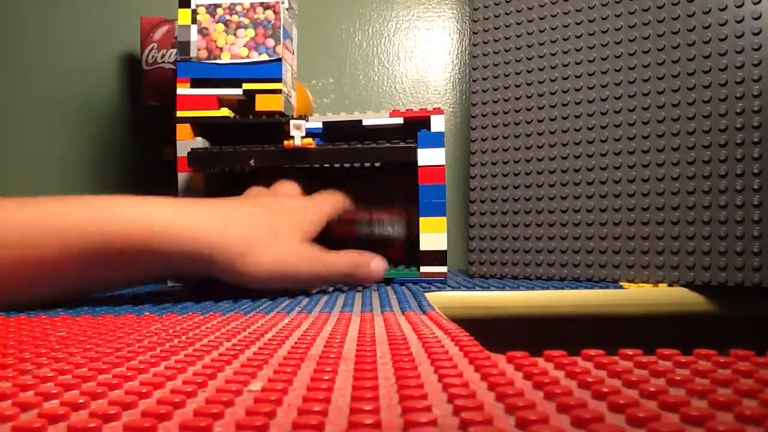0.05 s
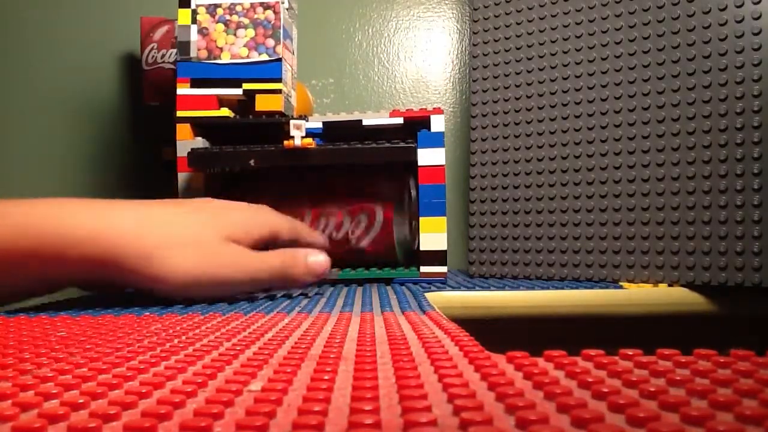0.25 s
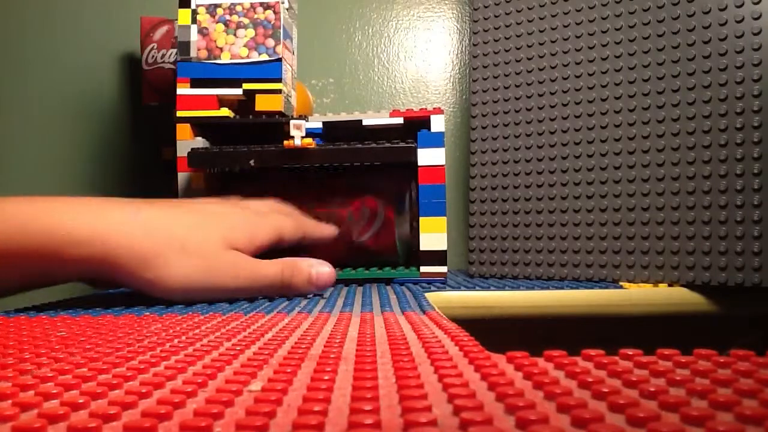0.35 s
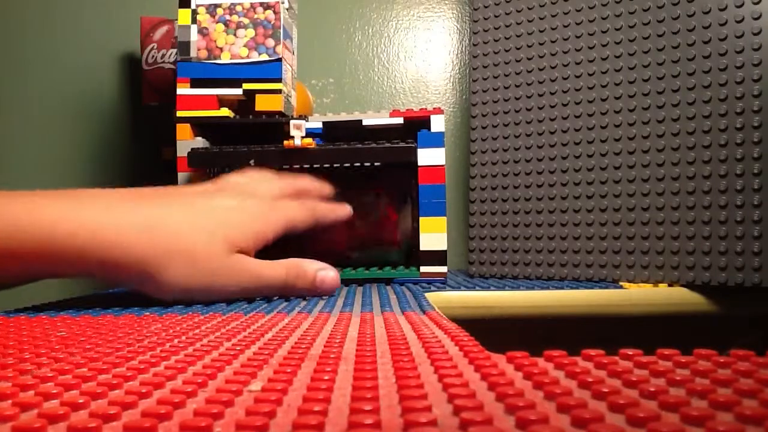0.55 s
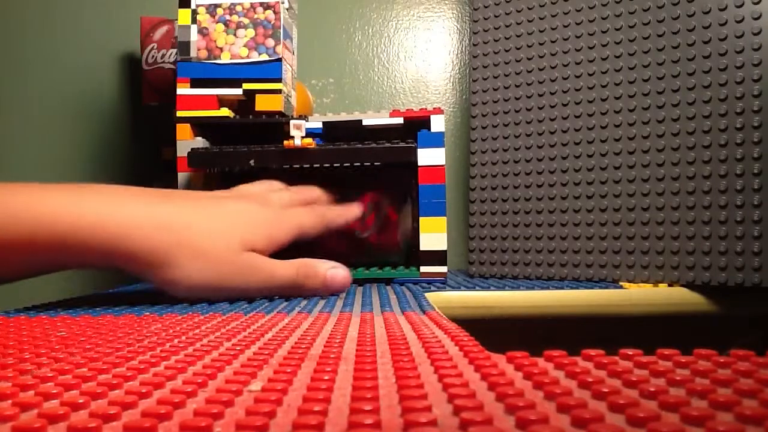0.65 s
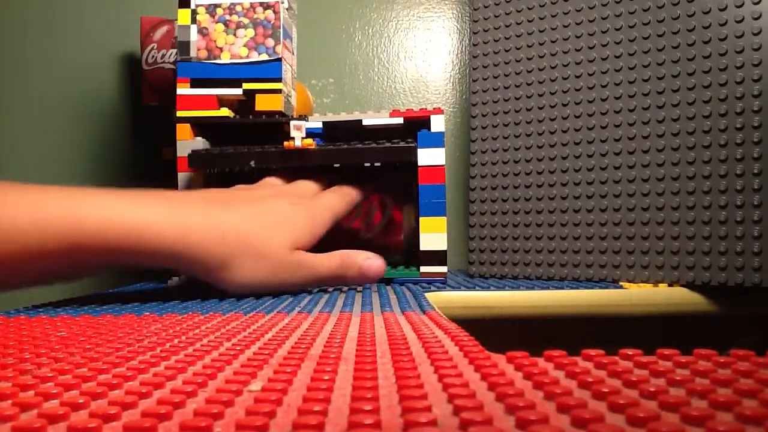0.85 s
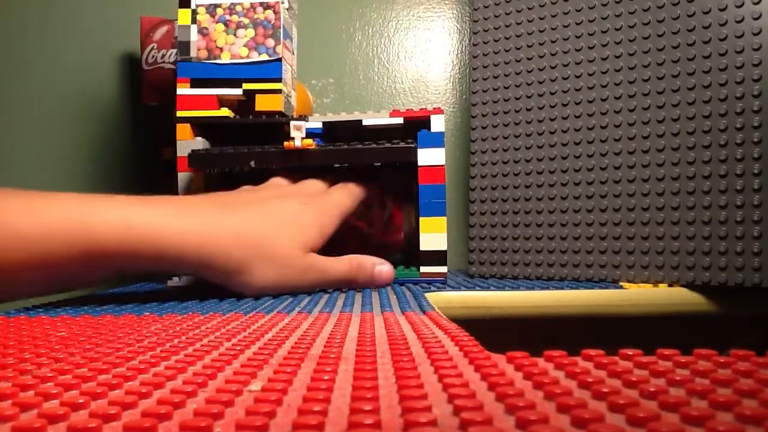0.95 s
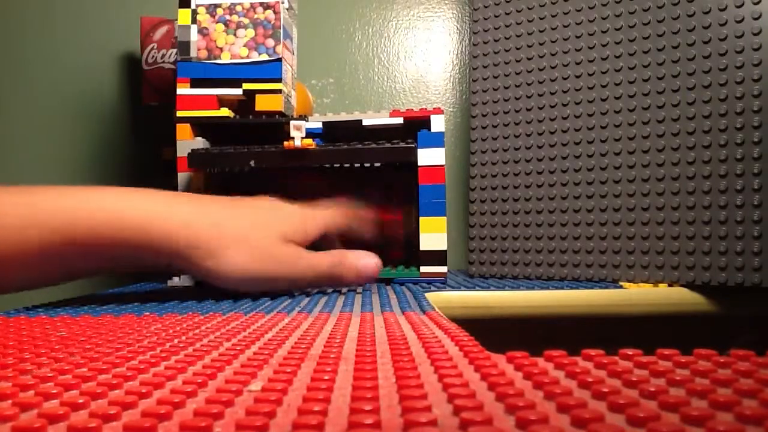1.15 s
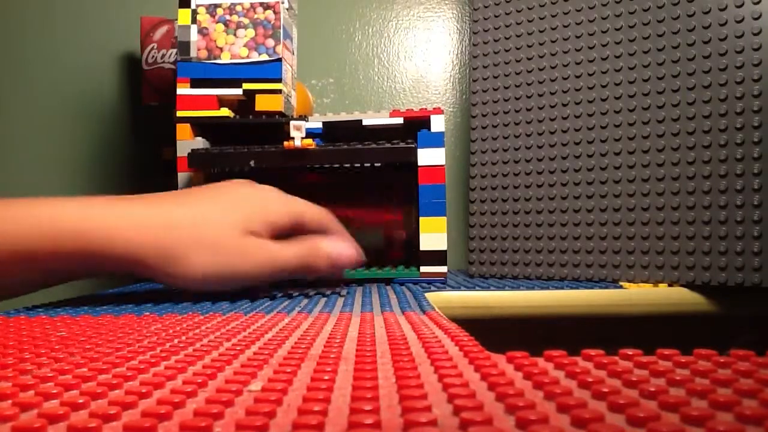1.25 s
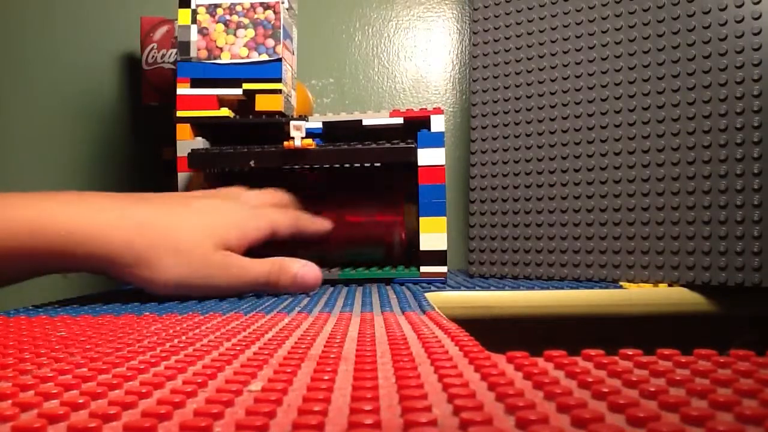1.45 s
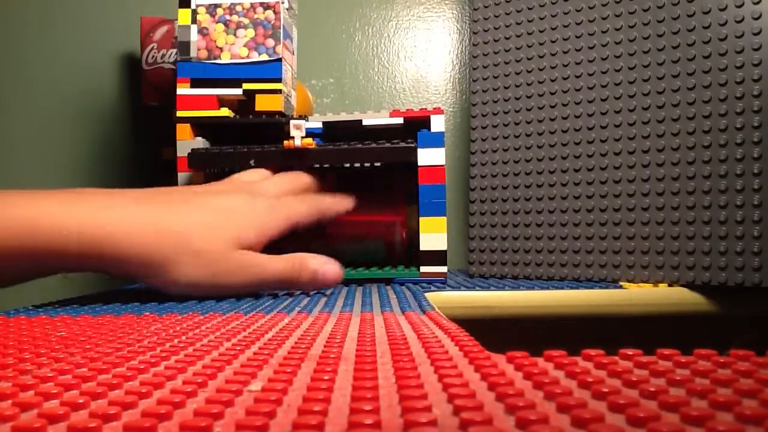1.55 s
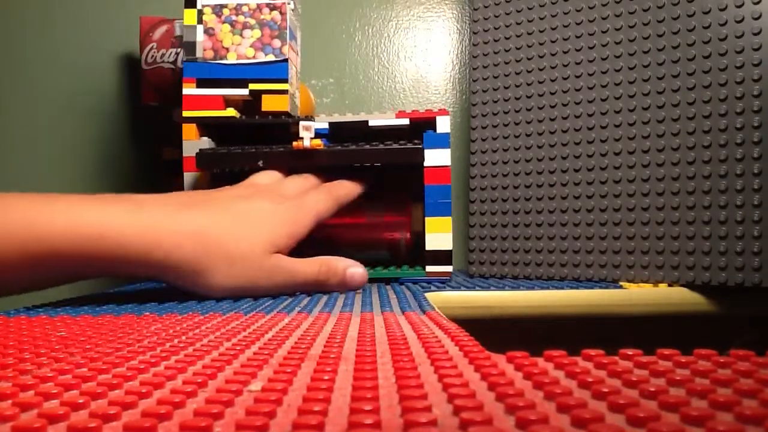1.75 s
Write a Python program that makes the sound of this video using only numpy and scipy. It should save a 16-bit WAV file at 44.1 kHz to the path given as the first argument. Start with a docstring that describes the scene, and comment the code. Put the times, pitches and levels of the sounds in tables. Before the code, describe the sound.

An empty drink can rattles and knocks as a hand rolls it in a chute of plastic toy bricks. It rolls twice, ringing faintly, with soft brushing and small ticks in between, in a small room.

```python
"""An empty drink can, rolled to and fro by hand in a chute of plastic toy bricks, knocks and rattles.
Its blows on the walls and its bumps over the studs excite the hollow chute and the can's own modes,
which ring on. In between, the hand brushes the bricks; short pitched ticks and squeaks are heard too.
The chute lies on a table in a small room, which adds a short reverberation and a steady room tone."""
import sys
import numpy as np
from scipy import signal
from scipy.fft import rfft, irfft, next_fast_len
from scipy.io import wavfile
from scipy.ndimage import map_coordinates

SR = 44100
rng = np.random.default_rng(int(sys.argv[2]) if len(sys.argv) > 2 else 0)


def master(y):
    """Save y as 16-bit WAV."""
    cut = np.clip(np.atleast_2d(y).T, -1, 1)
    pcm = np.round(cut * 32767)  # scale
    wavfile.write(sys.argv[1], SR, pcm.astype(np.int16))


N = 79380

# The four registers: bass, middle, upper middle, treble. Each row: nominal centre in Hz, contact t60 and
# room t60 in seconds, then gains in dB for the room's tail, the knocks, the rolling and the brushing.
REGISTERS = [(280, 0.053, 0.44, -13.5, -4, -7, -5), (1000, 0.064, 0.32, -16, -3, -4, -5.5),
             (3100, 0.052, 0.22, -13, -9, -1.5, -1.5), (9000, 0.035, 0.22, -17, 4, -10.5, -4.5)]


def knocks():
    """Impact: knocks against the walls, each with its own level and tone colour; most are the can's, the one at
    0.37 s is the hand striking a brick."""
    # Each row: start in seconds, level in dB, then bass, middle and treble offsets in dB.
    impacts = [(.0875, -37, -3, -1, -27), (.128, -35, -5, -7, -19), (.2008, -35.5, -19, 8, -17),
               (.2038, -14, -25.5, -12.5, -11.5), (.208, -19.5, -12, -18, -19),
               (.2495, -21, -12, -9.5, -16), (.2857, -30, -10, -5, -6.5), (.3114, -30, -25, 1, -16),
               (.3698, -19.5, -39, -16, -8), (.3844, -29, -9.5, -22, -11), (.4773, -37.5, -3, 0, -17.5),
               (.569, -42.5, -11, -1.5, -16.5), (.654, -54.5, 0, -2.5, -1), (.8343, -39.5, -22, -1.5, -10),
               (.850, -43, -27, 0, -7), (.881, -37, -20, -20, -7.5), (.9431, -49.5, 0, 2.5, -17),
               (1.0285, -45, -19, -20, -18), (1.1328, -21, -10, -6, -33), (1.169, -18, -18, -5, -23),
               (1.1977, -16.5, -17, -18, -16), (1.2278, -19, -19.5, -2.5, -21),
               (1.2525, -23.5, -4, -1, -14), (1.2784, -26, -6, 0, -21), (1.3198, -29, -13, -15, -17),
               (1.3965, -19.5, -18.5, -13.5, -14.5), (1.4125, -31, -28, -30, -11),
               (1.4375, -33, 2.5, 4.5, -28), (1.4485, -24, -18, -5.5, -14), (1.5157, -40.5, -11, 9, -13),
               (1.606, -48.5, -5, -2, -5), (1.6555, -36.5, -16, -31, -7), (1.7202, -48, -7, -5, -8),
               (1.7938, -37, -26, -16, -19)]
    out, knock_db = np.zeros(N), np.transpose(REGISTERS)[4]
    for start, db, bass, middle, treble in impacts:
        gains = amp(db + np.array([bass, middle, 0, treble]) + knock_db)
        add(out, start, gains @ contact())
    return out


def roll_controls(treble_share=0.67):
    """Rolling excitation: gain per register, push on the modes, and its centre in Hz, rising with speed."""
    # One list per roll. Each row: time in seconds, rattle level, bass offset, brightness and push in dB,
    # centre of the push in Hz.
    rolls = [
        [(0, -48.5, 3, -5, -35.5, 683), (.105, -57.5, -2, 2, -62, 740), (.118, -63, -5, -11, -38, 930),
         (.14, -48, 5.5, -7, -44.5, 1030), (.195, -56.5, 10, -3, -46, 1080),
         (.212, -42.5, -16, 13, -18.5, 1200), (.24, -44.5, 9.5, 3.5, -39, 1270), (.275, -37, -1, 6, -26, 1280),
         (.29, -37.5, 5, -0.5, -28.5, 1160), (.303, -43, 4, -1, -34.5, 407), (.322, -44, 1, 0.5, -37.5, 327),
         (.345, -60, 9, -2, -40.5, 303), (.39, -39.5, 1, 4, -65, 406), (.43, -42.5, 2.5, -7.5, -41, 730),
         (.46, -70, -3.5, -21, -43.5, 860), (.495, -44, 6, -10, -46, 940), (.53, -82, -8, -18, -44, 890)],
        [(1.122, -43, -10, 8, -35, 1190), (1.131, -51, -13, 0, -58, 1200), (1.15, -32, 3, 0.5, -30, 1200),
         (1.162, -43, -1, 0, -42, 1200), (1.185, -36.5, 3, -2, -28.5, 1140), (1.222, -31, -1.5, -6, -34, 1270),
         (1.231, -34.5, 6.5, 3, -21.5, 1350), (1.265, -37, -1.5, 3, -24, 1460), (1.30, -39, 3.5, -5, -35, 1350),
         (1.34, -46, 3, 4.5, -43, 1290), (1.385, -56.5, 9, 5.5, -52, 1180), (1.43, -46.5, 7, 4, -39, 900),
         (1.46, -39.5, 4.5, 0, -36, 905), (1.50, -39.5, 1.5, -1.5, -31.5, 970),
         (1.54, -45, -4, -14.5, -36, 870), (1.59, -71, -11, -12, -42, 830), (1.63, -52, 5, -16, -58, 800)],
    ]
    t, gain, push, centre = np.arange(N) / SR, 0, 0, 0
    for roll in rolls:
        times, *columns = np.transpose(roll)
        db, bass, bright, push_db, hz = [np.interp(t, times, column) for column in columns]
        moving = (t >= times[0]) * (t <= times[-1])
        gain += moving * amp(db + np.array([bass, 0 * t, bright, treble_share * bright]))
        push += moving * amp(push_db)
        centre += moving * hz
    return gain, push, np.maximum(centre, 1)


def rolling():
    """Rolling noise: the rims bump over the studs, louder and brighter when pushed hard."""
    gain, _, _ = roll_controls()
    roll_db = np.transpose(REGISTERS)[5, :, None]
    return rattle(gain * amp(roll_db), per_s=520, scatter_db=2)


def can_ring(blows, grip_change_s=1, push_octaves=0.41, decay_scale=0.44, struck_db=-1.5, waver_per_s=35):
    """Resonance: each mode stores energy from the blows and the rolling rim and rings it out, wavering."""
    # Each row: frequency in Hz, gain in dB before and after the grip changes, and a time in seconds
    # that decay_scale turns into the mode's t60.
    modes = [(306.4, 2.5, -7, 0.15), (404, -7, -6.5, 0.07), (468.3, -18, -3.5, 0.28), (689, -12, -11, 1),
             (798, -13.5, -12.5, 0.1), (880, -15.5, -14.5, 0.99), (913.4, -13, -15, 0.79),
             (959, -13.5, -18, 0.21), (1157, -13.5, -12, 0.83), (1224, -11.5, -16.5, 0.1),
             (1255, -7.5, -11, 0.094), (1300, -5.5, -8.5, 0.56), (1404, -14.5, -6.5, 0.34),
             (1437, -29, -14, 0.13), (1530, -10, -29, 1), (1606, -13, -17.5, 0.15), (1804, -7, -29, .35),
             (1891, -18, -20, 0.52), (2137, -30, -30, 1), (2253, -10, -6.5, 0.37), (2376, -12.5, -24, 0.22),
             (2390, -6.5, -13, 0.12), (2618, -12, -27, 0.22), (3555, -7.5, -8.5, 0.092),
             (3827, -20, -28, 0.21), (4500, -9, -11, 0.07)]
    t, out = np.arange(N) / SR, np.zeros(N)
    _, push, centre = roll_controls()
    for hz, before_db, after_db, decay in modes:
        octave = signal.butter(2, [hz / np.sqrt(2), hz * np.sqrt(2)], "band", fs=SR, output="sos")
        struck = amp(struck_db) * signal.sosfilt(octave, blows)
        rolled = push * np.exp(-.5 * (np.log2(hz / centre) / push_octaves) ** 2)
        retained = amp(-60 / (decay_scale * decay * SR)) ** 2  # share of energy left after one sample
        energy = signal.lfilter([1 - retained], [1, -retained], struck ** 2 + rolled ** 2)
        phasor = np.exp(2j * np.pi * rng.random())
        waver = .35 * (wobble(waver_per_s) + 1j * wobble(waver_per_s))
        tone = np.real((phasor + waver) * np.exp(2j * np.pi * hz * t))
        out += amp(np.where(t < grip_change_s, before_db, after_db)) * np.sqrt(np.abs(energy)) * tone
    return out


def contact(size=32768, attack_s=0.00089, ripple_db=3.5, ripple_hz=127.9):
    """Impulse response of one spot, a row per register: the chute's short clack and the room's tail."""
    # Response of the hollow chute. Each row: frequency in Hz, gain in dB.
    chute = [(60, -59), (120, -21), (160, -6), (222, 0.5), (272, -8), (330, 9), (410, 0.5), (510, 0),
             (620, 1), (820, -0.5), (1080, 1.5), (1320, 1), (1680, -2), (1900, -2.5), (2040, -4),
             (2350, -5), (2800, -7), (3500, -6.5), (4200, -11), (4900, -6.5), (5600, -11), (6500, -7),
             (7600, -11), (9000, -10), (10500, -16), (13000, -16.5), (15500, -23)]
    # Each entry: boundary between two registers in Hz.
    crossovers = [487, 1724, 5370]
    hz, t = np.fft.rfftfreq(size, 1 / SR), np.arange(size) / SR
    power_below = [0 * hz] + [1 / (1 + (hz / edge) ** 8) for edge in crossovers] + [1 + 0 * hz]
    bands = np.sqrt(np.abs(np.diff(power_below, axis=0)))
    # Each spot has its own peaks and dips.
    ripple = ripple_db * map_coordinates(rng.standard_normal(600), [hz / ripple_hz], mode="wrap")
    white = rfft(rng.standard_normal((len(REGISTERS), size)))
    noise = unit(irfft(white * bands * amp(along(chute, hz) + ripple)))
    _, clack_t60, room_t60, room_db = np.transpose(REGISTERS)[:4, :, None]
    decay = np.hypot(amp(-60 * t / clack_t60), amp(room_db - 60 * t / room_t60))
    envelope = decay * (1 - np.exp(-t / attack_s))
    return unit(noise * envelope) * np.sqrt(np.mean(envelope ** 2, axis=1, keepdims=True))


def rattle(gain, per_s, scatter_db, spots=4, count=4000):
    """Superposition: small, irregular contacts at several spots follow one gain curve per register."""
    out = np.zeros(N)
    for _ in range(spots):
        times = np.cumsum(np.exp(.6 * rng.standard_normal(count))) * spots / per_s
        signs = rng.choice([-1, 1], count)
        strengths = amp(scatter_db * np.minimum(rng.standard_normal(count), 1.18))  # capped log-normal
        ticks = np.bincount((times * SR).astype(int).clip(0, N), signs * strengths, N + 1)[:N]
        response = contact()
        response /= np.linalg.norm(response, axis=1, keepdims=True)
        out += signal.fftconvolve(unit(ticks) * gain, response, axes=1).sum(0)[:N]
    return out / np.sqrt(spots)


def pings(size=8192, roughness=0.79, knots_per_cycle=.04, attack_s=.001):
    """Damped vibration: short pitched ticks and squeaks, and a faint ring after the first roll."""
    # Each row: start in seconds, frequency in Hz, level in dB, t60 in seconds.
    notes = [(.087, 774, -36, 0.081), (.207, 423, -28.5, 0.093), (.836, 10500, -54, .04),
             (0.88, 8290, -41, 0.041), (.68, 2220, -61.5, 0.18), (1.016, 10700, -59, 0.026),
             (1.03, 400, -43.5, 0.072), (1.321, 6200, -47, 0.034), (1.413, 6700, -32, .03)]
    out, t = np.zeros(N), np.arange(size) / SR
    for start, hz, db, t60 in notes:
        real, imag = [map_coordinates(knots, [t * hz * knots_per_cycle], mode="wrap")
                      for knots in rng.standard_normal((2, 200))]
        tone = np.imag((1 + roughness * (real + 1j * imag)) * np.exp(2j * np.pi * hz * t))
        envelope = amp(db - 60 * t / t60) * (1 - np.exp(-t / attack_s))
        add(out, start, tone * envelope)
    return out


def brushing():
    """Sliding friction: skin on plastic makes fine grains of sound that swell and fade with each stroke."""
    # Each row: peak time in seconds, rise and fall in seconds per 20 dB, level in dB, bass offset in dB.
    strokes = [(0.076, .1, .09, -47, -11), (.68, 0.45, 0.033, -66.5, 2), (0.844, 0.074, 0.073, -48.5, 1.5),
               (0.894, 0.036, 0.045, -58, 12), (1.026, 0.016, 0.01, -46, 3), (1.075, 0.082, .06, -61.5, 4),
               (1.128, 0.034, 0.021, -37.5, -13), (1.653, 0.053, 0.071, -47.5, 0),
               (1.743, .03, 0.064, -70, 16), (.95, 0.055, 0.051, -66, 2)]
    t, gain = np.arange(N) / SR, 0
    for peak, rise, fall, db, bass in strokes:
        swell_db = db - 20 * np.maximum((peak - t) / rise, (t - peak) / fall)
        gain += amp(swell_db + np.array([bass, bass / 2, 0, 0])[:, None])
    brush_db = np.transpose(REGISTERS)[6, :, None]
    return rattle(gain * amp(brush_db), per_s=2500, scatter_db=12.5)


def room_tone(rms_db=-60):
    """Stationary noise: the room's steady background, strongest at low frequencies."""
    # Each row: frequency in Hz, relative level in dB.
    spectrum = [(25, -21), (50, -26), (64, -20), (78, -4), (96, -10), (120, -5), (170, -3), (240, 1.5),
                (350, -6.5), (480, -13.5), (680, -4), (900, -3.5), (1300, -20), (2500, -20), (6700, -17.5),
                (10000, -21), (15000, -21.5)]
    colour = amp(along(spectrum, np.fft.rfftfreq(N, 1 / SR)))
    return amp(rms_db) * unit(irfft(rfft(rng.standard_normal(N)) * colour, N))


def low_cut(x, cutoff_hz=126):
    """High-pass filtering removes the deep bass."""
    return signal.sosfilt(signal.butter(5, cutoff_hz, "high", fs=SR, output="sos"), x)


def amp(db):
    """Decibels as an amplitude ratio."""
    return 10 ** (np.asarray(db) / 20)


def unit(x):
    """Normalisation of each row to an RMS of one."""
    return x / np.sqrt(np.mean(x ** 2, axis=-1, keepdims=True) + 1e-20)


def along(points, hz):
    """Interpolation of (Hz, value) points on a logarithmic frequency axis."""
    frequencies, values = np.transpose(points)
    return np.interp(np.log(hz + 1), np.log(frequencies + 1), values)


def wobble(knots_per_s):
    """Random modulation: a smooth curve through random knots."""
    return map_coordinates(rng.standard_normal(400), [np.arange(N) * knots_per_s / SR], mode="wrap")


def add(track, start_s, sound):
    """Superposition of a sound on the track."""
    i = int(max(start_s, 0) * SR)
    track[i:i + len(sound)] += sound[:N - i]


def scene():
    """Excitation and response: knocks and rolling ring the can, above the hand and the room tone."""
    blows = knocks() + rolling()
    objects = blows + can_ring(blows) + pings() + brushing()
    return (low_cut(objects) + room_tone())[None]


def record(dry, top_hz=15350):
    """Band limiting: an ideal low-pass filter removes the highest treble."""
    size = next_fast_len(N + SR // 2)
    passband = np.fft.rfftfreq(size, 1 / SR) < top_hz
    return irfft(rfft(dry, size) * passband, size)[..., :N]


dry = scene()
out = record(dry)
master(out)
```